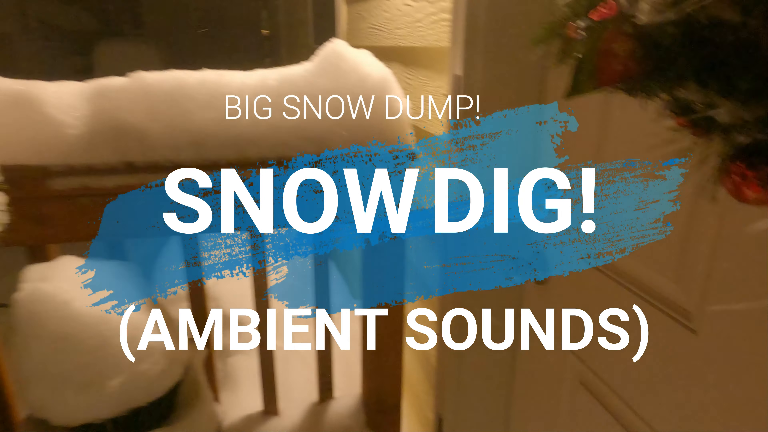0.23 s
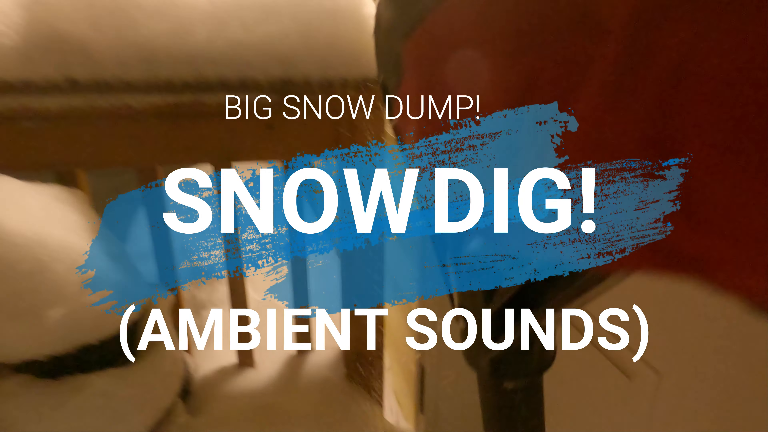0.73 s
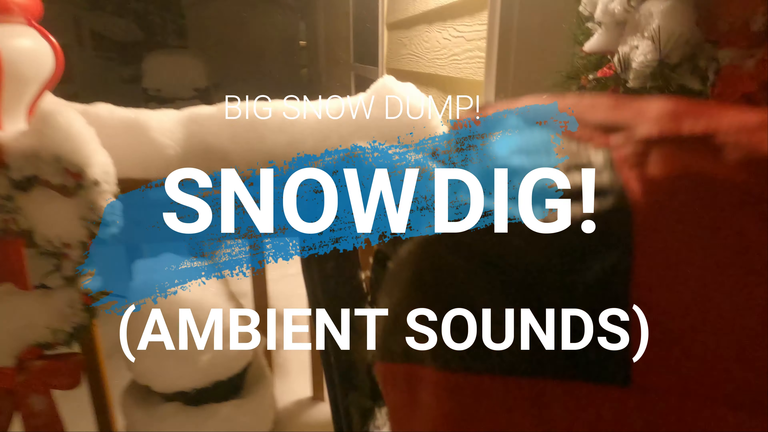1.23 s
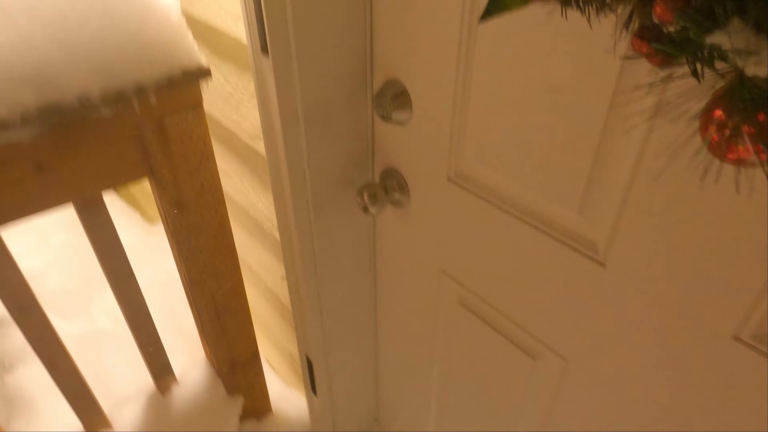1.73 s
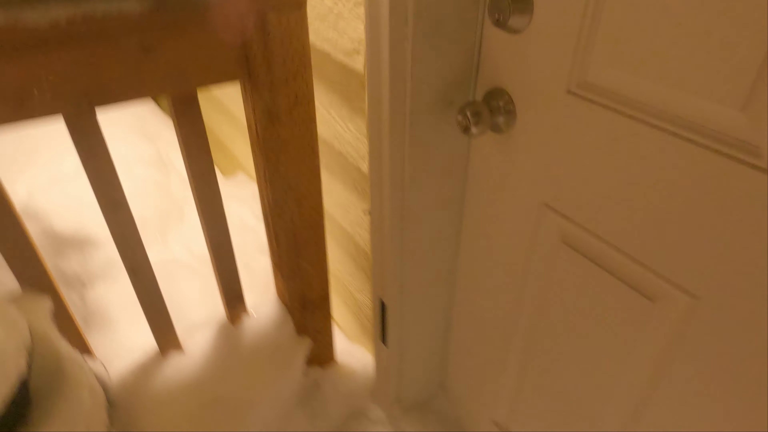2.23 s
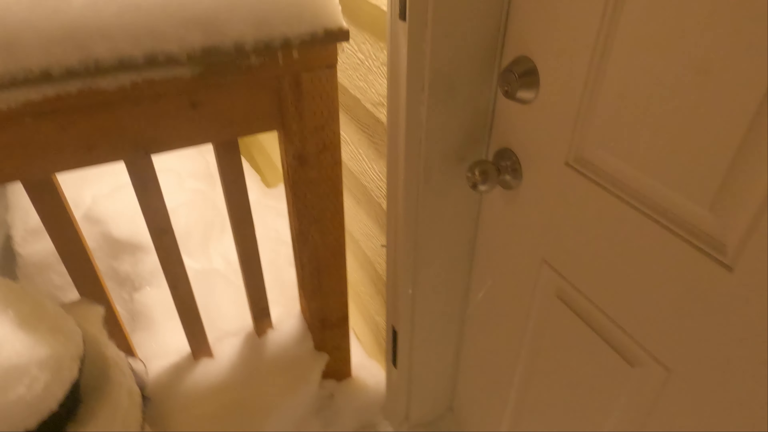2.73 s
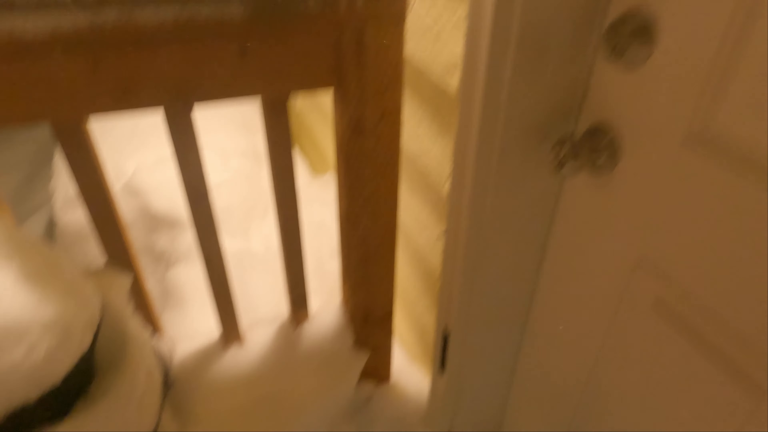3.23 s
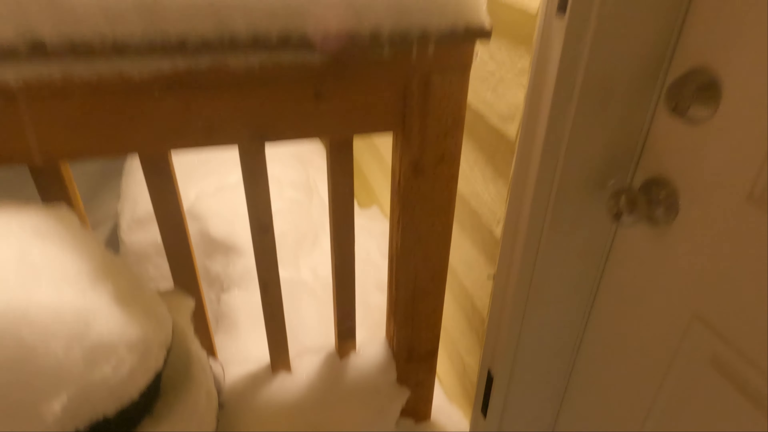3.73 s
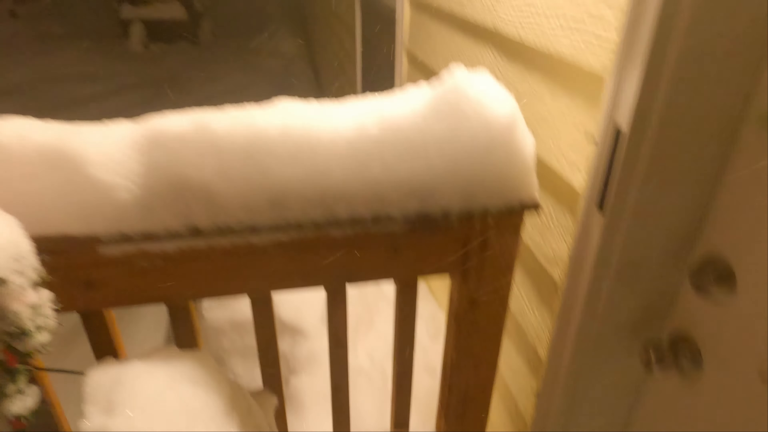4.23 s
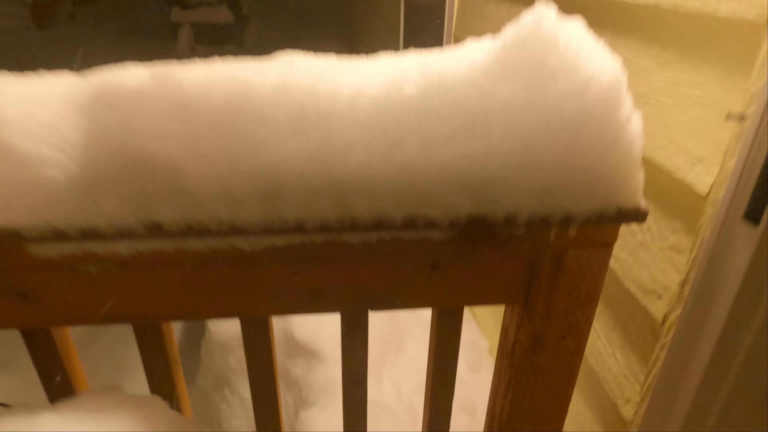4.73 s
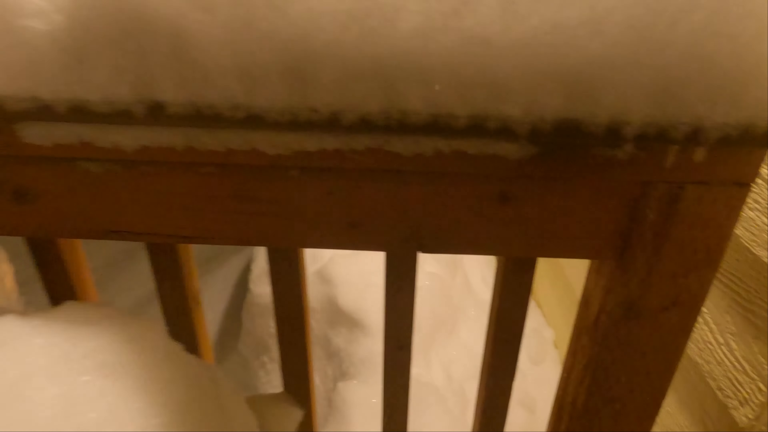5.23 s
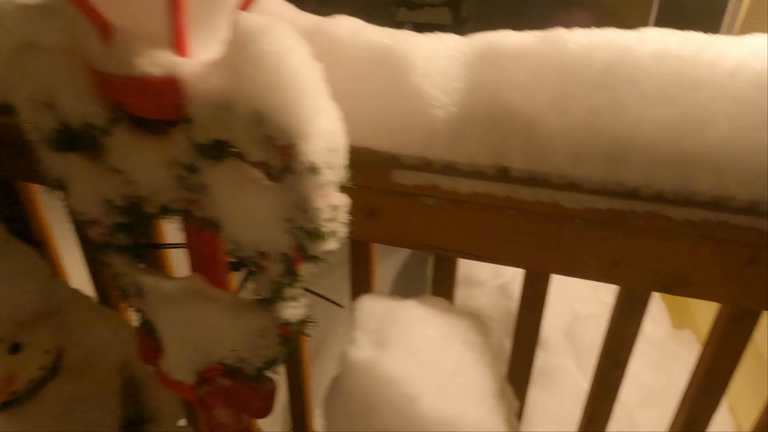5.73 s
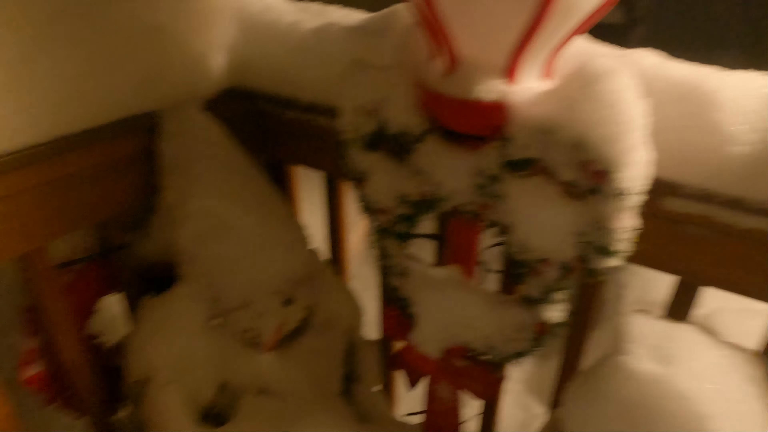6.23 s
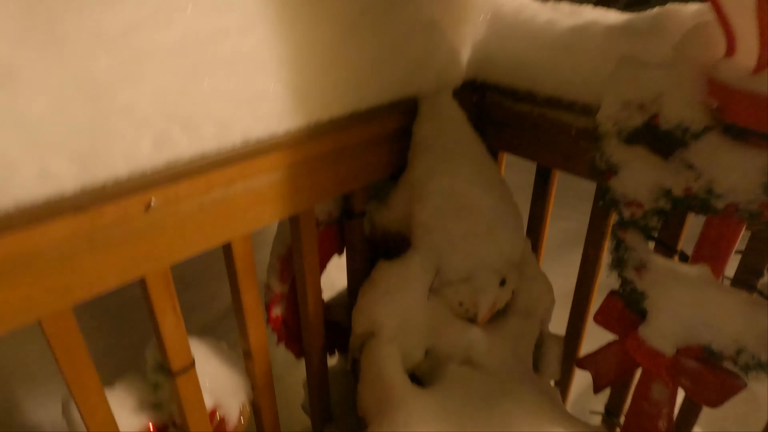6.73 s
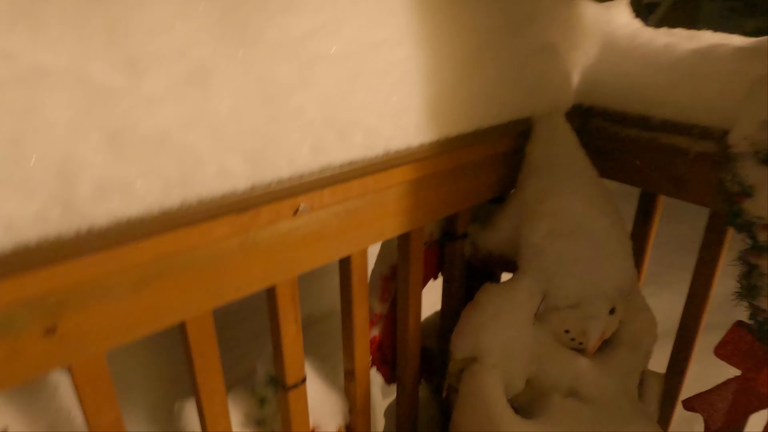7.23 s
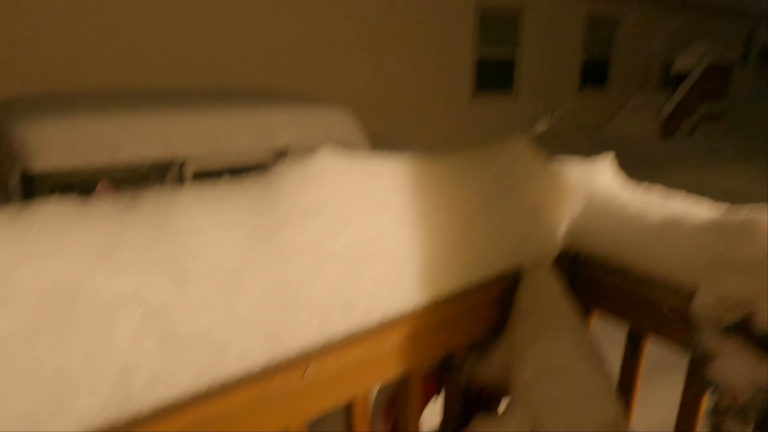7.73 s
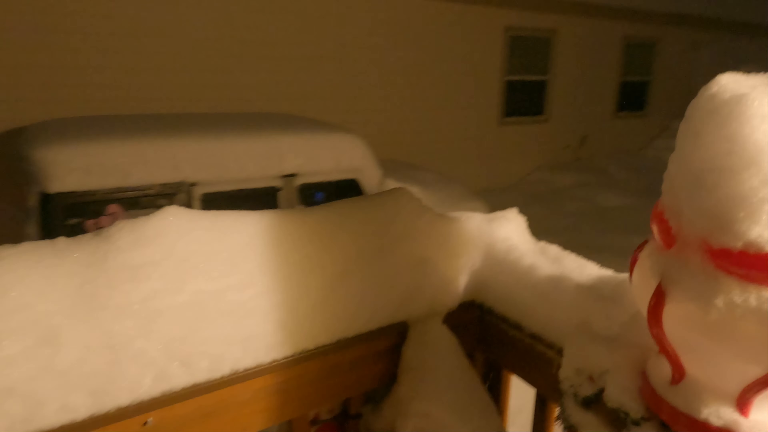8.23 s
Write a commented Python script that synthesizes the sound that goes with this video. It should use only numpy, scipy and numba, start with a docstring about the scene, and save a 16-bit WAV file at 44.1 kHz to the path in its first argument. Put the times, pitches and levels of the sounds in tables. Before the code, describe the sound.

Close snow shovelling on a wooden porch at night: scoop knocks, crunchy scrapes and a tossed load, over a deep idling engine hum.

```python
"""Shovelling a snowy wooden porch at night, over an engine idling nearby with a deep hum.
Blade blows knock scoop and boards from the start; grain noise scrapes through snow in slips and pushes.
Early on a distant car's tones rise and fade, frozen crumbs tick and a coat sleeve swishes.
Near 7 s a load pours off the scoop as lumpy grains; loose snow then settles and trickles, with faint last knocks.
Throughout, gain control ducks everything after loud strokes and creeps back."""
import sys
import numpy as np
from scipy import signal
from scipy.fft import rfft, irfft, next_fast_len
from scipy.io import wavfile
from scipy.ndimage import uniform_filter1d
from numba import njit

SR = 44100
rng = np.random.default_rng(int(sys.argv[2]) if len(sys.argv) > 2 else 0)


def to_wav(sig):
    """Store sig (one row per channel, or 1-D mono) as 16-bit WAV at the path in sys.argv[1].

    Samples outside -1..1 are clipped; the rate is SR.
    """
    pcm = np.clip(np.atleast_2d(sig), -1, 1) * 32767
    pcm = np.round(pcm).astype(np.int16)
    wavfile.write(sys.argv[1], SR, pcm.T)  # frames by channels


N = 373527
T = np.arange(N) / SR


def undb(db):
    """Decibels to amplitude gain."""
    return np.exp(np.asarray(db) * (np.log(10) / 20))


def unit(x):
    """Scale to rms 1."""
    return x / np.sqrt(np.mean(x ** 2))


def curves(table):
    """Columns of a table, joined by straight lines in time."""
    s, *columns = np.transpose(table)
    return [np.interp(T, s, c) for c in columns]


def walk(rate_hz):
    """Random levels, rate_hz of them a second, joined by straight lines; rms 1."""
    step = max(int(SR / rate_hz), 2)
    levels = rng.standard_normal(N // 50)
    return unit(np.interp(np.arange(N), step * np.arange(len(levels)), levels))


def swells(table):
    """Summed gain of bell-shaped swells; half_width_s is where the bell falls to 1/e."""
    gain = 0
    for peak_s, half_width_s, level_db in table:
        distance = np.minimum(np.abs(T - peak_s) / half_width_s, 10)
        gain = gain + undb(level_db) * np.exp(-distance ** 2)
    return gain


def colour(points):
    """Minimum-phase impulse response of unit energy with the given spectrum."""
    hz, db = np.transpose(points)
    size = 4096
    f = np.maximum(np.fft.rfftfreq(size, 1 / SR), 1)
    cepstrum = irfft(np.log(undb(np.interp(np.log(f), np.log(hz), db))))
    # folding the cepstrum makes the response causal
    cepstrum[1:size // 2] *= 2
    cepstrum[size // 2 + 1:] = 0
    h = irfft(np.exp(rfft(cepstrum)))
    return h / np.linalg.norm(h)


def body(points, modes, ring_db):
    """Response of a struck object: a dull direct sound plus decaying modes, detuned by the spot hit."""
    direct = colour(points)
    t = np.arange(len(direct)) / SR
    ringing = np.zeros(len(t))
    for pitch_hz, t60_s, level_db in modes:
        mode_hz = pitch_hz * (1 + 0.01 * rng.standard_normal())
        decay = undb(level_db - 60 * t / t60_s) / np.sqrt(t60_s)
        ringing += decay * np.sin(2 * np.pi * mode_hz * t)
    h = direct + undb(ring_db) * ringing / np.linalg.norm(ringing)
    return h / np.linalg.norm(h)


def through(x, h):
    """Play x through an impulse response."""
    size = next_fast_len(len(x) + len(h), True)
    return irfft(rfft(np.float32(x), size) * rfft(np.float32(h), size), size)[:len(x)]


def late(x, delay_s):
    """Delay, fixed or moving."""
    return np.interp(T - delay_s, T, x)


def add(out, start_s, x):
    """Mix x into out from start_s on."""
    i = int(start_s * SR)
    out[i:i + len(x)] += x[:len(out) - i]


@njit
def resonate(x, hz, q):
    """Band-pass with a moving centre; white noise keeps its power."""
    y, band, low = np.empty(len(x)), 0., 0.
    for i in range(len(x)):
        g = np.tan(np.pi * hz[i] / SR)
        v = (band + g * (x[i] - low)) / (1 + g * (g + 1 / q))
        band, low, y[i] = 2 * v - band, low + 2 * g * v, v / np.sqrt(g * q)
    return y


def grains(per_s, spread_db, count, limit=1.4):
    """Snow crystals breaking: clicks of unequal size, reaching count paths with unrelated signs; rms 1."""
    at = np.flatnonzero(rng.random(N) < per_s / SR)
    size = undb(spread_db * np.minimum(rng.standard_normal(N)[at], limit))
    sign = np.where(rng.integers(0, 2, (count, N), dtype=bool)[:, at], 1, -1)
    out = np.zeros((count, N))
    out[:, at] = size * sign * np.sqrt(N / np.sum(size ** 2))
    return out


def clumps(per_s, spread_db, decay_s):
    """Power of lumps that crumble one after another, each a sudden burst that dies away; mean 1."""
    t = np.arange(SR // 16) / SR
    bursts = grains(per_s, spread_db, count=1, limit=1.1)[0] ** 2
    power = np.abs(through(bursts, np.exp(-t / decay_s)))
    return power / power.mean()


def blow(h, t60_s, rattle, rise_s=0.00016):
    """An impulse and a rattle of crushed snow that builds and dies, into a response; rms 1 over 20 ms."""
    t = np.arange(SR // 4) / SR
    chatter = rng.standard_normal(len(t)) * undb(-60 * t / t60_s) * (1 - np.exp(-t / rise_s))
    x = through((t == 0) + rattle * chatter / np.linalg.norm(chatter), h)
    return x / np.sqrt(np.mean(x[:SR // 50] ** 2))


def ring(pitch_hz, t60_s, rise_s=0.0015):
    """The mode that a blow hits hardest, a decaying sine; rms 1 over 20 ms."""
    t = np.arange(SR // 4) / SR
    x = np.sin(2 * np.pi * pitch_hz * t) * undb(-60 * t / t60_s) * (1 - np.exp(-t / rise_s))
    return x / np.sqrt(np.mean(x[:SR // 50] ** 2))


def shade(x, treble_db):
    """Shelve the treble above about 5 kHz; snow muffles a buried blade and a falling load."""
    soft = signal.sosfiltfilt(signal.butter(2, 5200, fs=SR, output="sos"), x)
    return soft + undb(treble_db) * (x - soft)


def cupped(x, echo_db=-6.5, path_s=0.0013, wander=0.1245):
    """The scoop's back wall mirrors the sound; the path wanders as the blade tilts, moving the comb ridges."""
    echo = undb(echo_db)
    return (x + echo * late(x, path_s * np.exp(wander * walk(14)))) / np.hypot(1, echo)


# blade pushed through snow; low bite skims and hisses, high bite is hollow and heavy; the hollow's pitch glides:
# (start_s, length_s, level_db, swell_over_push_db, bite_db, hollow_from_hz, hollow_to_hz, hollow_db, width_hz)
PUSHES = [(0.197, 0.1, -51.5, -17, 25, 1450, 880, -7, 151), (0.33, 0.07, -34, -3, 9, 1900, 1600, 6, 700),
          (0.395, 0.041, -32, -4, 5, 960, 930, -2, 150), (.438, 0.038, -34, 5, 6.5, 1000, 890, -3.5, 150),
          (0.54, 0.11, -27, 4, 3, 900, 920, -22, 300), (1.866, 0.023, -23.5, -10, 0, 1200, 1000, -26, 300),
          (1.915, 0.046, -15, 1, -6.5, 1200, 1280, -32, 298), (2.26, 0.023, -16, 0, 4, 1040, 1010, -3, 199),
          (2.297, 0.071, -22.5, 11, -2, 930, 1010, -5, 150),
          (2.407, 0.16, -19.5, 12, -8, 885, 1080, -10.5, 150),
          (3.289, 0.032, -26.5, 0, 8.5, 1050, 950, -2.5, 500),
          (3.366, 0.053, -20, 1.5, 5, 1050, 1330, -10, 150),
          (3.408, 0.051, -30.5, -4.5, 7.5, 1330, 1300, -5, 300),
          (3.484, 0.044, -22.5, -8, 1.5, 1700, 1540, -5, 70),
          (3.535, 0.067, -17.5, -2, 0, 1350, 950, -6.5, 300),
          (3.599, 0.086, -16, -9, 3.5, 1430, 1520, -10, 300),
          (3.693, 0.16, -16, 9, -7, 930, 1120, -10, 120),
          (3.893, 0.04, -27.5, -2.5, -4, 1050, 950, -16, 150),
          (4.737, 0.029, -19.5, -13.5, -1.5, 1700, 1760, -1.5, 80),
          (4.835, 0.069, -17.5, 6, 1.5, 1280, 1350, -10, 89.5),
          (4.907, 0.163, -37.5, 2.5, 6.5, 1300, 1320, -13, 120),
          (5.123, 0.12, -26.5, -3, -1, 1400, 1230, -8, 100),
          (5.255, 0.082, -25.5, 2.5, 5, 1585, 1324, 1.5, 800),
          (5.361, 0.026, -20.5, 2, 0.5, 1170, 1080, -2, 200),
          (5.389, 0.12, -25, 0.5, -3.5, 767, 950, 0.5, 259),
          (5.511, 0.22, -28, 1.5, -9, 910, 1030, -6, 160),
          (5.703, 0.078, -20, -6, -5, 2000, 1750, -11.5, 300),
          (5.782, 0.041, -19, -6, -13, 1300, 1200, -15, 200),
          (5.858, 0.043, -17.5, -0.5, -3.5, 1800, 1817, -7, 300),
          (5.903, 0.04, -23.5, -12, -2, 480, 397, -9.5, 89),
          (5.978, 0.064, -13, -4, -6.5, 1320, 1380, -10.5, 150)]
# jerks as the blade catches and breaks free: (start_s, level_db, bite_db, ring_hz, ring_db)
SLIPS = [(0.41, -31, 3, 2150, 4), (0.655, -13.5, -0.5, 1160, -9), (0.694, -14.5, 1.5, 605, -2.5),
         (2.585, -16, -4.5, 2510, -8.5), (2.614, -20.5, -0.5, 1050, -2.5), (2.654, -16, -5.5, 2060, -13),
         (2.664, -14.5, -2, 936, -14), (2.673, -41, 0, 710, 18.5), (3.645, -28, 2, 976, 15.5),
         (3.842, -29.5, 8, 1290, 5.5), (3.88, -17, -12.5, 1295, -16), (3.942, -14, -3, 1110, -17),
         (4.97, -22.5, 1.5, 1330, -6.5), (5.066, -41, 4, 1730, 1.5), (5.162, -26.5, 6.5, 1300, 4),
         (5.204, -32, 12.5, 1270, 1), (5.411, -27.5, 0, 745, 5.5), (5.603, -15.5, -5, 1003, -5.5),
         (5.945, -16, -8.5, 1094, -5.5), (6.066, -13, -5, 1290, -10.5), (6.083, -17.5, -1, 1290, -21.5),
         (7.159, -16.5, -1, 1500, -16), (7.226, -35.5, 3, 977, -7.5)]
SLIP_S, SLIP_WIDTH_HZ = 0.016, 82
PUSH_EDGE_S, SLIP_EDGE_S = 0.013, 0.0076  # rise and fall


def strokes():
    """Pushes and jerks in one form, each with its edge time."""
    pushes = [(*row, PUSH_EDGE_S) for row in PUSHES]
    slips = [(start_s, SLIP_S, level_db, 0, bite_db, hz, hz, ring_db, SLIP_WIDTH_HZ, SLIP_EDGE_S)
             for start_s, level_db, bite_db, hz, ring_db in SLIPS]
    return pushes + slips


# spectra of skimming rasp, gritty snow, scoop clack, board thud: (frequency_hz, level_db)
SKIM = [(2000, -17.5), (4000, -4.5), (5300, 0.5), (7200, -2), (8500, -8.5), (12500, -19), (15500, -36.5)]
GRIT = [(1200, -11), (2200, 0), (3200, -1.5), (5000, -1), (7200, -3), (8500, -10.5), (10000, -15.5),
        (12500, -23), (15500, -45.5)]
CLACK = [(250, -22), (550, 9.5), (1000, 6), (1800, -1), (2500, -15), (4500, -3.5), (9000, -74)]
THUD = [(40, -28.5), (90, -2.5), (170, 3), (300, -2), (480, -7), (750, -17.5), (2000, -50)]
# modes of the plastic scoop and the porch boards: (pitch_hz, t60_s, level_db)
SCOOP = [(564, 0.03, 5.5), (684, 0.17, -6.5), (950, 0.17, -3), (1080, 0.026, -7), (1294, 0.011, 1),
         (1770, 0.02, 2.5), (2200, 0.11, -3)]
BOARDS = [(100, 0.12, 10), (146, 0.14, 5), (186, 0.33, -2.5), (259, 0.2, 1), (297, 0.16, -1.5),
          (362, 0.12, -1.5), (420, 0.19, -0.5), (519, 0.14, -3), (660, 0.13, -12)]
SKIM_DB, BOARDS_DB = -6.5, -5  # relative to the grit
SKIM_PER_BITE, GRIT_PER_BITE, BOARDS_PER_BITE = -0.22, 0.26, 1.35  # dB per dB of bite
HOLLOW_WANDER = 0.035  # log-pitch rms detuning by sliding lumps
OVERTONE_RATIO, OVERTONE_DB = 1.47, -12.5  # the hollow's second resonance


def slides(judder_db=1.1, chatter_db=0.68):
    """Blade sticks and slips; breaking grains hiss, clatter in the scoop, ring its hollow, shake the boards."""
    judder = undb(judder_db * walk(280) + chatter_db * walk(90))
    # fine powder hisses; packed lumps crunch in uneven bursts
    powder = grains(per_s=12000, spread_db=1.5, count=5)
    crunch = clumps(per_s=130, spread_db=-0.5, decay_s=0.0035)
    crunch_db = np.array([[-7], [-2], [1.5], [0], [-3]])  # one per path
    paths = powder * np.sqrt(1 + undb(crunch_db) ** 2 * crunch) * judder
    skim, grit, scoop, boards, drive = (unit(path) for path in paths)
    detune = np.exp(HOLLOW_WANDER * walk(45))
    power, hollow = np.zeros((4, N)), np.zeros(N)
    for start_s, length_s, db, swell_db, bite_db, from_hz, to_hz, ring_db, width_hz, edge_s in strokes():
        t = np.arange(int(length_s * SR) + SR // 10) / SR
        along = np.minimum(t / length_s, 1)
        begin_s = start_s - edge_s / 2
        first = int(begin_s * SR)
        edges = np.minimum(t / edge_s, 1) * np.exp(-np.maximum(t - length_s, 0) / edge_s)
        shape = undb(db + swell_db * (along - .5)) * edges
        parts_db = (SKIM_DB + SKIM_PER_BITE * bite_db, GRIT_PER_BITE * bite_db,
                    bite_db, BOARDS_DB + BOARDS_PER_BITE * bite_db)
        for part, part_db in zip(power, parts_db):
            add(part, begin_s, (shape * undb(part_db)) ** 2)
        hz = (from_hz + (to_hz - from_hz) * along) * detune[first:first + len(t)]
        push = undb(ring_db) * shape * drive[first:first + len(t)]
        q = float(from_hz / width_hz)
        overtone = undb(OVERTONE_DB) * resonate(push, OVERTONE_RATIO * hz, q)
        add(hollow, begin_s, resonate(push, hz, q) + overtone)
    skim, grit, scoop, boards = np.sqrt(power) * np.array([skim, grit, scoop, boards])
    rasp = cupped(through(skim, colour(SKIM)) + undb(-3) * through(grit, colour(GRIT)))
    clatter = undb(-5.5) * through(scoop, body(CLACK, SCOOP, ring_db=-7.5))
    shaking = undb(-2.0) * through(boards, body(THUD, BOARDS, ring_db=-5))
    return rasp + clatter + undb(-2.0) * hollow + shaking


# blows on the porch, the last few from footsteps; hardness sets clack and crack over thud: # (start_s,
# level_db, hardness_db, thud_pitch_hz, thud_t60_s, clack_pitch_hz)
KNOCKS = [(.2, -19, 4.5, 189, 0.19, 1390), (0.31, -12.5, 0, 179, 0.45, 2137),
          (.348, -17.5, -0.5, 160.5, 0.41, 640), (0.492, -7.5, -4.5, 238, 0.079, 488),
          (1.843, -13, -1, 283, 0.14, 816), (1.914, -13.5, -16, 213, .06, 684),
          (1.954, -8, -1, 199, 0.096, 1150), (1.968, -3.5, -17, 303, 0.017, 674),
          (2.138, -30.5, -6, 213, 0.044, 730), (2.247, -22.5, 7, 247, 0.08, 1545),
          (2.275, -19, -15.5, 286, 0.18, 990), (3.291, -11, 1, 239, 0.041, 1060),
          (3.347, -10, -2, 284, 0.18, 1516), (3.378, -13.5, -11, 240, 0.098, 683),
          (3.532, -25.5, 13, 420, 0.082, 660), (3.569, -21, 2, 422, 0.099, 780),
          (3.884, -29, -6, 270, 0.1, 604), (4.625, -15, -4.5, 288, 0.13, 547),
          (4.733, -18.5, 2, 137, 0.088, 600), (4.744, -13, -4, 226, 0.3, 716),
          (4.756, -12.5, -5, 282.5, 0.19, 990), (4.867, -19.5, -8.5, 420, 0.071, 1290),
          (4.903, -12.5, -5.5, 212, 0.065, 660), (4.954, -14, -3.5, 420, 0.053, 1287),
          (5.028, -16, 3, 260, 0.041, 1315), (5.133, -18.5, -2, 400, 0.087, 992),
          (5.362, -23.5, 5.5, 287.6, 0.35, 1010), (5.618, -25, 5, 267, 0.06, 1130),
          (5.977, -18, -1.5, 385, 0.11, 617), (6.159, -30.5, -17, 193, 0.068, 810),
          (6.865, -23.5, -6.5, 215, 0.08, 920), (7.918, -40, -18, 335, 0.037, 550),
          (7.967, -33, -22, 246, 0.0084, 573), (8.076, -46.5, -9, 302, 0.045, 756),
          (8.222, -41, -21, 238, .04, 600), (8.316, -34.5, -26, 200, 0.064, 894)]
THUD_T60_S = 0.076  # rattle under the thud


def knocks():
    """Each blow, of the blade or, late on, of a step, cracks sharply, clacks and thuds in the boards, tuned by
    the spot."""
    out = np.zeros(N)
    for start_s, level_db, hardness_db, thud_hz, thud_t60_s, clack_hz in KNOCKS:
        thud = undb(-2.5) * blow(body(THUD, BOARDS, ring_db=-3.0), THUD_T60_S, rattle=2.8)
        thud += undb(-4.5) * ring(thud_hz, thud_t60_s)
        scoop = body(CLACK, SCOOP, ring_db=-5.5)
        clack = undb(-8.0) * blow(scoop, t60_s=0.059, rattle=18.0, rise_s=0.0015)
        clack += undb(-10.5) * ring(clack_hz, t60_s=0.045)
        crack = undb(-7.5) * blow(colour(GRIT), t60_s=0.031, rattle=58, rise_s=0.00054)
        add(out, start_s, undb(level_db) * (thud + undb(hardness_db) * (clack + crack)))
    return out


# deck flexing under a heavy blow, a shift of weight or a landing lump: (start_s, level_db, pitch_hz)
BOOMS = [(0.216, -20, 80.3), (0.314, -15.5, 118), (0.504, -11, 62), (1.35, -26.5, 96), (1.915, -17, 105),
         (3.294, -9, 93.7), (3.3, -12, 163.5), (3.363, -13.5, 133), (4.423, -30, 96), (4.759, -13, 96),
         (6.386, -25.5, 109.7), (6.47, -30, 95), (6.639, -27.5, 95), (7.015, -20, 161.5),
         (7.04, -17.5, 164), (7.067, -15, 150.8), (7.095, -17.5, 129.5)]


def booms(t60_s=0.19):
    """Joists sag and swing back: low decaying sines."""
    out = np.zeros(N)
    for start_s, level_db, pitch_hz in BOOMS:
        add(out, start_s, undb(level_db) * ring(pitch_hz, t60_s, rise_s=0.001))
    return out


# spectra of soft rubbing (cloth or loose snow) and the heap's flump: (frequency_hz, level_db)
CLOTH = [(200, -14.5), (400, 3), (750, 4.5), (1100, 7.5), (1700, 3.5), (2600, -4.5), (4500, -14.5),
         (9000, -61)]
FLUMP = [(50, -12), (110, 5.5), (160, 6), (250, 3), (450, -6), (750, -35.5), (2000, -30)]
THROW_START_S, THROW_FULL_S, THROW_HOLD_S = 6.77, 7.0, 0.11
THROW_DB, THROW_RISE_DB_PER_S, THROW_FALL_DB_PER_S = -16.5, 106, 174


def throw(onset_s=0.011, heap_growth=1.23, landing_s=0.0047):
    """A load slides off the scoop and lands a moment later; the heap's level moves faster than the hiss."""
    since_s = T - THROW_FULL_S
    rise_db = THROW_RISE_DB_PER_S * np.minimum(since_s, 0)
    flow_db = rise_db - THROW_FALL_DB_PER_S * np.maximum(since_s - THROW_HOLD_S, 0)
    levels_db = THROW_DB + np.array([flow_db, flow_db, heap_growth * late(flow_db, landing_s)])
    lumpy = np.sqrt(1 + undb(1.0) * clumps(per_s=110, spread_db=2.5, decay_s=0.0048))
    stream = unit(grains(per_s=9000, spread_db=3.0, count=3) * lumpy)
    onset = np.clip((T - THROW_START_S) / onset_s, 0, 1)
    grit, scoop, heap = stream * undb(levels_db) * onset
    hiss = undb(-1.5) * through(grit, colour(GRIT))
    rub = undb(-4.5) * through(scoop, colour(CLOTH))
    return hiss + rub + undb(-3.0) * through(heap, colour(FLUMP))


# loose snow settling after the throw: (peak_s, half_width_s, level_db)
SETTLING = [(7.56, 0.065, -51), (7.62, 0.028, -40), (7.8, 0.026, -46.5), (7.93, 0.13, -52.5),
            (7.99, 0.013, -44), (8.33, 0.031, -55.5)]


def settling(fine_db=-18, soft_db=-0.5):
    """Loose snow settles: dense and sparse grains, soft and dull with a little crackle."""
    dense = grains(per_s=7600, spread_db=2.5, count=2)
    sparse = undb(-2.5) * grains(per_s=210, spread_db=0.5, count=2)
    fine, soft = (dense + sparse) * swells(SETTLING)
    return undb(fine_db) * through(fine, colour(GRIT)) + undb(soft_db) * through(soft, colour(CLOTH))


# snow slipping down the heap: (time_s, centre_hz, level_db)
TRICKLE = [(7.53, 1900, -53), (7.6, 1520, -48.5), (7.645, 960, -43), (7.69, 754, -55)]


def trickle():
    """A little snow slips down the heap: grains in a band that falls as it slows."""
    hz, db = curves(TRICKLE)
    sliding = (T > TRICKLE[0][0]) & (T < TRICKLE[-1][0])
    flow = grains(per_s=1600, spread_db=4, count=1)[0] * undb(db) * sliding
    return shade(resonate(flow, hz, 3.1), treble_db=-11.0)


# icy crumbs landing: (start_s, peak_db, ring_pitch_hz)
CRUMBS = [(.276, -20, 1300), (0.848, -29, 6460), (.919, -17.5, 736), (0.952, -18, 980), (0.98, -15, 950),
          (1.393, -20, 3500), (1.403, -28, 9000), (1.422, -25, 4200), (1.46, -17, 8500), (1.469, -21, 5500),
          (1.517, -12, 3300), (1.552, -14, 4500), (1.682, -28, 5000), (1.78, -22, 5000),
          (2.021, -29.5, 3000), (2.83, -36, 4050), (6.168, -22, 6500), (7.385, -36, 3000),
          (7.498, -36.5, 1500)]


def crumbs(crack_db=-3, ring_q=2.0):
    """Frozen lumps tick: a sharp crack and a very short ring, lower on the scoop, higher on ice."""
    out = np.zeros(N)
    for start_s, peak_db, pitch_hz in CRUMBS:
        response = colour([(300, 6), (9000, -12), (15500, -20)])
        contact = blow(response, t60_s=0.008, rattle=1.0, rise_s=.0002)
        tick = resonate(contact, np.full(len(contact), float(pitch_hz)), ring_q)
        tick += undb(crack_db) * through(contact, colour(GRIT))
        add(out, start_s, undb(peak_db) * tick / np.abs(tick).max())
    return out


# coat sleeve brushing past: (peak_s, half_width_s, level_db)
RUSTLES = [(.18, 0.45, -47), (1.01, 0.048, -40.5), (1.255, 0.064, -40), (1.44, 0.075, -41.5),
           (1.52, 0.018, -29), (1.6, 0.046, -32), (1.64, 0.015, -31), (1.81, 0.051, -38),
           (2.23, 0.039, -34.5)]
# swish spectrum: (frequency_hz, level_db)
SLEEVE = [(240, -15), (450, -3), (1000, -2), (2100, -5), (6500, -6), (8500, -15.5), (12300, -25.5),
          (15500, -42)]


def sleeve():
    """The coat sleeve swishes: dense grains with a slight flutter, in smooth swells."""
    rubbing = grains(per_s=15000, spread_db=3.0, count=1)[0]
    return through(rubbing * swells(RUSTLES) * undb(0.9 * walk(110)), colour(SLEEVE))


# idling engine: (time_s, firing_rate_hz)
IDLE_RATE = [(0, 39.4), (1.6, 39.2), (1.85, 38.3), (8.47, 38.35)]
# its tones: (multiple, level_db)
IDLE_ORDERS = [(1, 2.5), (1.75, -15), (2, -15.5), (3.003, -23), (4.003, -31.5)]
IDLE_DB = -23.5
# dip of the hum: (deepest_s, half_width_s, removed_part_db)
HUM_DIP = [(6.65, 0.92, -7)]
# distant car: (time_s, firing_rate_hz, level_db)
CAR = [(.6, 38.6, -60), (.85, 41.1, -42), (1.2, 45, -31.5), (1.6, 48.3, -32.5), (1.8, 50.6, -56)]
# its tones: (multiple, level_db)
CAR_ORDERS = [(3, -1), (5, -9.5), (6, -22)]


def engines():
    """Sines at multiples of the firing rate: a slightly wandering idle, and a far car gathering speed."""
    idle_hz = curves(IDLE_RATE)[0] * (1 + 0.0022 * walk(8.3))
    turn = 2 * np.pi * np.cumsum(idle_hz) / SR
    idle = sum(undb(db) * np.sin(k * turn) for k, db in IDLE_ORDERS)
    idle = idle * np.sqrt(2) * undb(IDLE_DB) * (1 - swells(HUM_DIP))
    car_hz, car_db = curves(CAR)
    turn = 2 * np.pi * np.cumsum(car_hz) / SR
    car = sum(undb(db) * np.sin(k * turn) for k, db in CAR_ORDERS)
    return idle + car * undb(car_db)


def wide_noise(points, width, waver_db):
    """Stereo noise of a given colour, with a wavering level."""
    mid, side = (through(rng.standard_normal(N), colour(points)) for _ in range(2))
    return undb(waver_db * walk(12)) * (mid + width * side * np.array([[1], [-1]]))


# spectra of rumble, buffets, traffic, hiss: (frequency_hz, level_db)
RUMBLE = [(15, -21.5), (30, 6), (60, 0.5), (100, -6), (160, -15), (300, -26.5), (900, -81.5)]
WIND = [(15, -14.5), (30, 4.5), (60, 2), (100, -2.5), (160, -10.5), (300, -21.5), (900, -60.5),
        (2500, -100)]
TRAFFIC = [(80, 4), (160, 8.5), (300, 7), (650, -3), (1050, -3.5), (1600, -11), (3000, -16.5),
           (7000, -61.5)]
HISS = [(1000, 1.5), (2300, -5), (4700, -6.5), (7000, -13), (9000, -22.5), (12500, -30), (15500, -63.5)]
RUMBLE_DB, TRAFFIC_DB = -44, -47
# low swells from wind and handling: (peak_s, half_width_s, level_db)
BUFFETS = [(.36, 0.26, -18.5), (1.42, 0.21, -26), (1.86, 0.093, -27), (3.15, 0.21, -40), (4.48, 0.16, -27),
           (5.62, 0.064, -29), (6.03, 0.16, -17.5), (6.44, 0.13, -27), (8.4, 0.062, -37.5)]
# fine hiss: (time_s, level_db)
HISS_LEVEL = [(0, -55), (.85, -47), (2.1, -43.5), (2.8, -51.5), (3.25, -50.5), (4.05, -50.5), (4.6, -52),
              (6.25, -49), (6.55, -63), (7.4, -61.5), (7.75, -59.5), (8.47, -63.5)]


def air():
    """Coloured noises: wavering rumble, buffets that differ between the ports, far traffic, fine hiss."""
    rumble = undb(RUMBLE_DB) * wide_noise(RUMBLE, width=0.1, waver_db=2.5)
    buffets = swells(BUFFETS) * wide_noise(WIND, width=0.36, waver_db=4.0)
    traffic = undb(TRAFFIC_DB) * wide_noise(TRAFFIC, width=0.1, waver_db=1.5)
    hiss = undb(curves(HISS_LEVEL)[0]) * wide_noise(HISS, width=0.36, waver_db=0.0)
    return rumble + buffets + traffic + hiss


def porch(x, wall_db=-11, tail_db=-14, t60_s=0.11):
    """The house wall returns a close, thin echo at a wandering delay; snow keeps the tail short."""
    thin = signal.sosfilt(signal.butter(1, 700, "high", fs=SR, output="sos"), x)
    wall_s = 0.0031 + 0.00048 * walk(2.5)
    ports_s = .00012
    t = np.arange(SR // 4) / SR
    out = []
    for side in (1, -1):
        tail = rng.standard_normal(len(t)) * undb(-60 * t / t60_s)
        wall = undb(wall_db) * late(thin, wall_s + side * ports_s)
        out.append(x + wall + undb(tail_db) * through(thin, tail / np.linalg.norm(tail)))
    return np.array(out)


def scene():
    """Digging a little to the right, the load straight ahead, the night's background under both."""
    digging = shade(slides(), treble_db=-3.0) + shade(knocks(), treble_db=-8)
    digging += shade(crumbs() + sleeve(), treble_db=1.0) + booms()
    left, right = porch(digging)
    # all-pass: left port about half a sample late
    left = signal.lfilter([.3, 1], [1, .3], left)
    ahead = porch(shade(throw(), treble_db=-6) + settling() + trickle())
    spread = 0.14
    load = spread * ahead + (1 - spread) * ahead.mean(axis=0)
    return np.array([left, right]) + load + engines() + air()


AGC_THRESHOLD_DB, AGC_RECOVERY_DB_PER_S = -18.5, 3
AGC_SHARE = 0.45  # share of the excess taken off


def gain_control(x):
    """Loud moments cut the gain at once; it creeps back, so the hum ducks and swells after loud strokes."""
    power = uniform_filter1d(np.mean(x, axis=0) ** 2, size=SR // 38)
    level_db = 10 * np.log10(power + 1e-12)
    cut_db = AGC_SHARE * np.maximum(level_db - AGC_THRESHOLD_DB, 0)
    recovered_db = AGC_RECOVERY_DB_PER_S * T
    return x * undb(recovered_db - np.maximum.accumulate(cut_db + recovered_db))


TOP_HZ = 15200


def record(dry):
    """Ride the gain, round the highest peaks and cut the top."""
    rounded = np.tanh(0.69 * gain_control(dry)) / 0.7
    return signal.sosfilt(signal.ellip(8, .2, 70, TOP_HZ, fs=SR, output="sos"), rounded)


dry = scene()
out = record(dry)
to_wav(out)
```